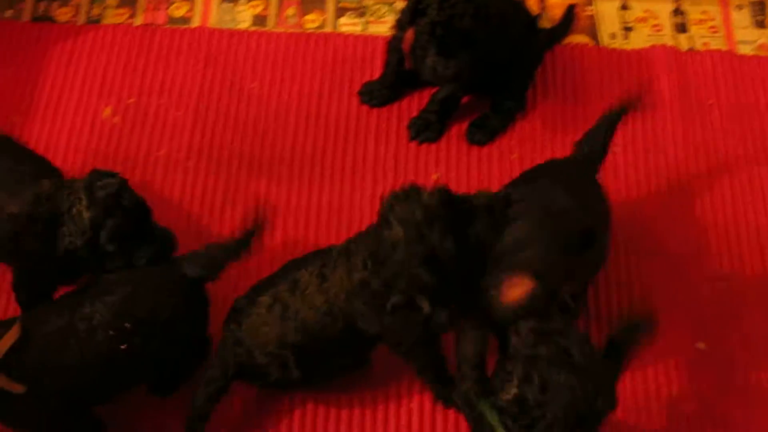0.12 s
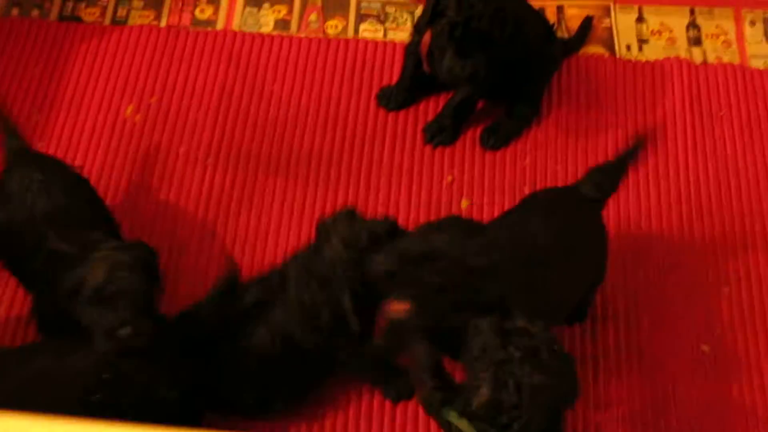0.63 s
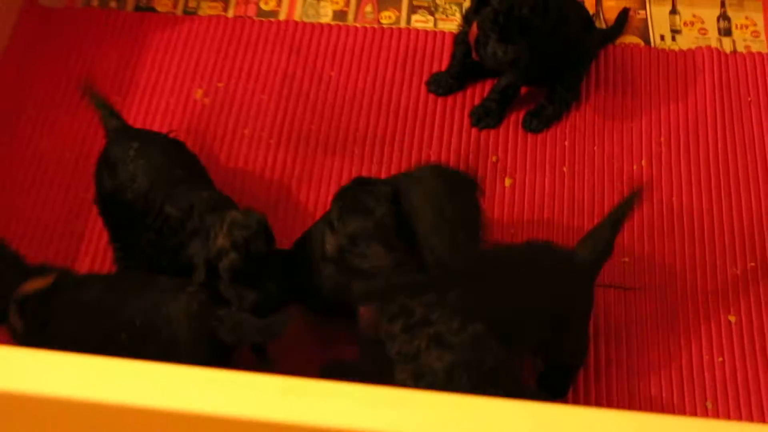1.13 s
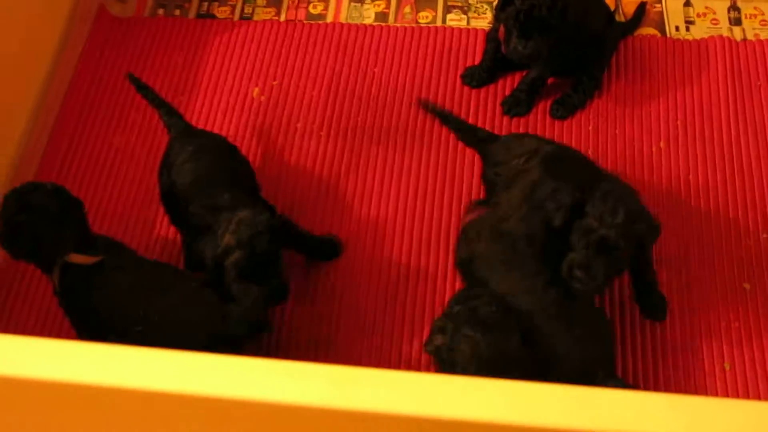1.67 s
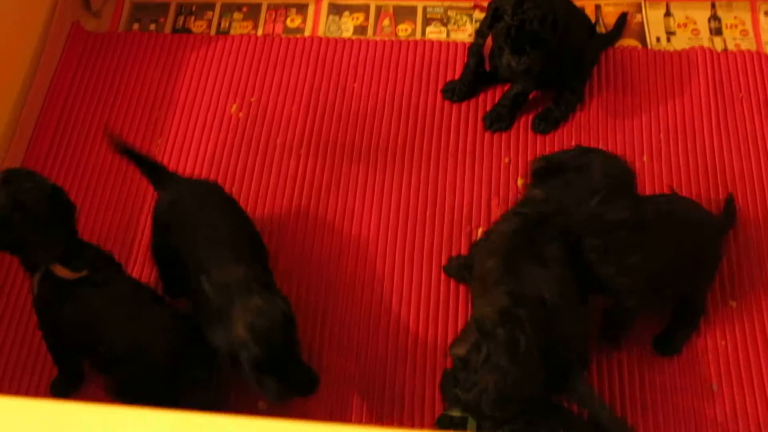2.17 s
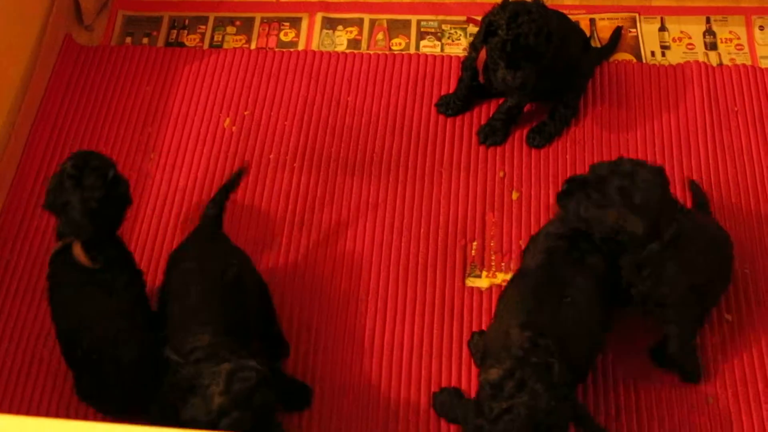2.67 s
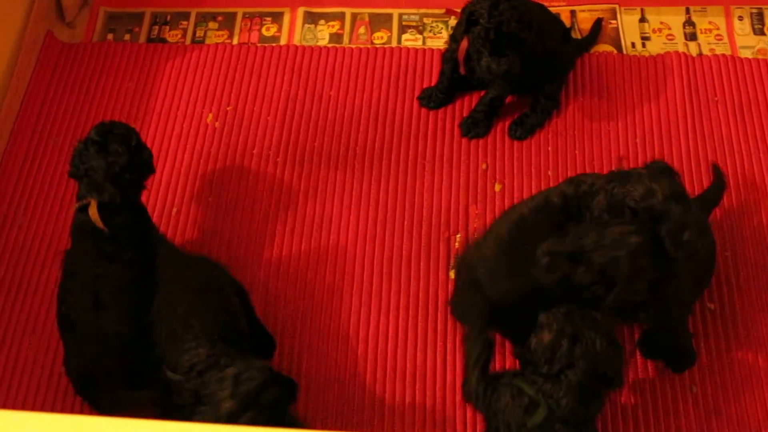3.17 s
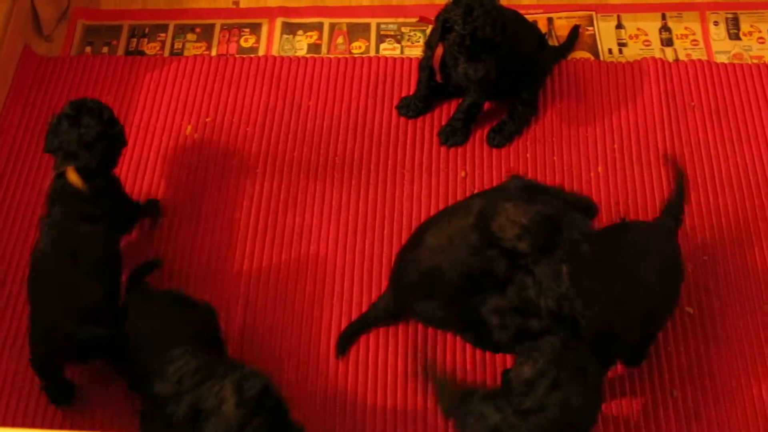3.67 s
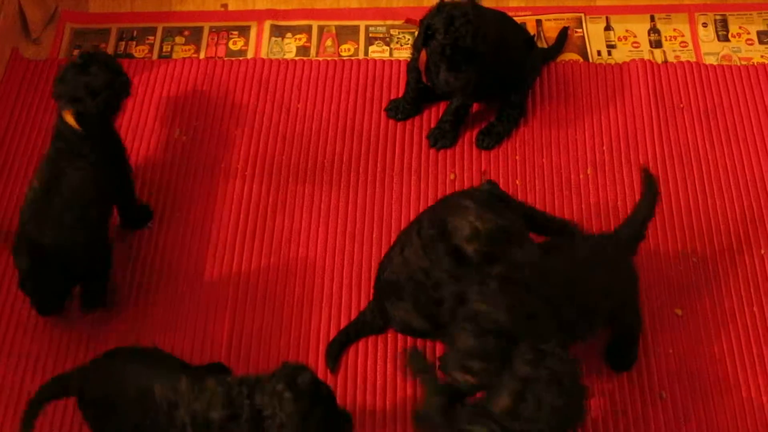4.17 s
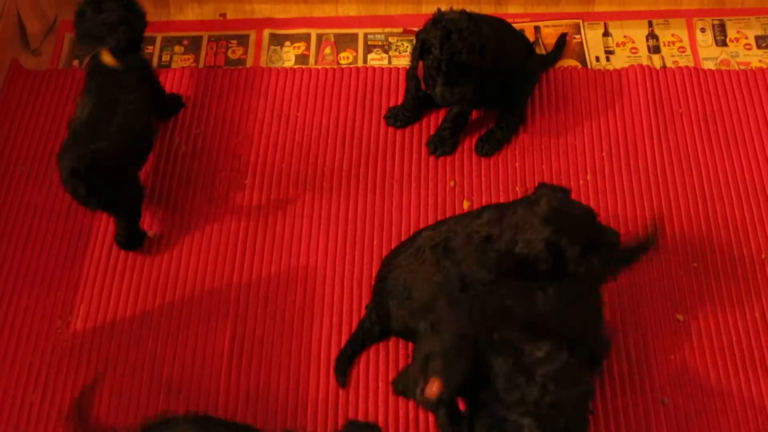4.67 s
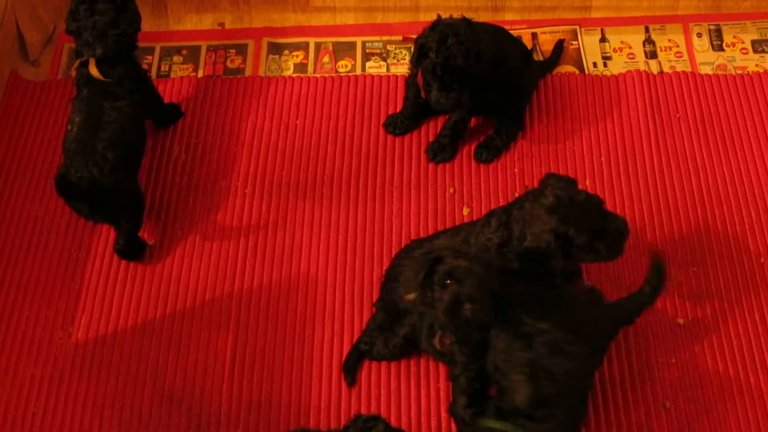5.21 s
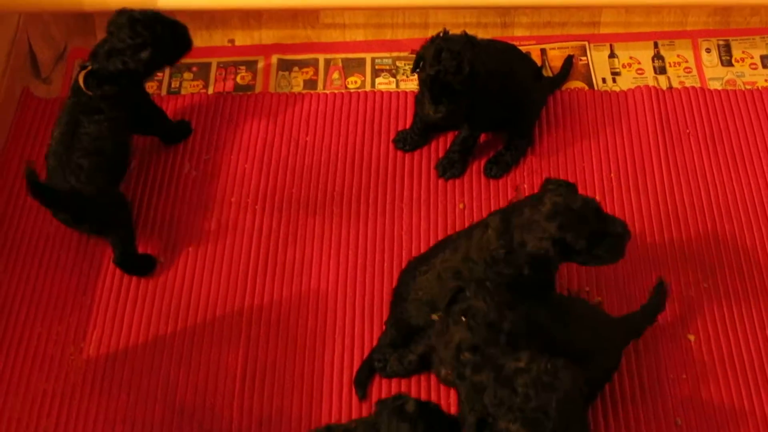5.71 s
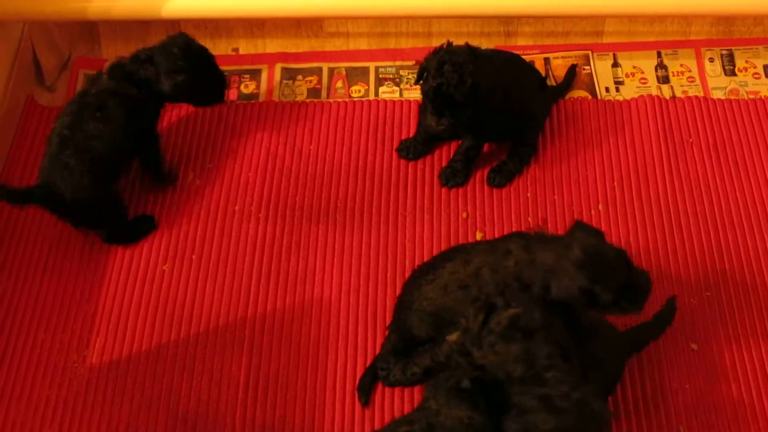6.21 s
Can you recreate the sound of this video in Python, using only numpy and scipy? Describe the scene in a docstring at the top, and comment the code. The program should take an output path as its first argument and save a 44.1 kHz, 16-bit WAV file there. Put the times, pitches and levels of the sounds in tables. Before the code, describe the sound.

A litter of puppies wrestles on a mat in a wooden pen indoors. Short puffs of breath come first, then rough little growls with a raspy, toothy edge, separated by pants and snorts. Soft paw thumps, wet mouth ticks and nasal air slip in between. The strongest snarl comes past the middle; one more growl and a tiny final grunt follow. Close microphone, faint room hum, short echo.

```python
"""Puppies wrestle on a rubber mat in a wooden pen indoors, over shaped noise for the faintly humming room.
They pant and snort in puffs of hiss; from 0.45 s they growl in bursts, vocal pulses ringing throat and mouth.
From 1.4 s short pushes ring the mat, wet ticks ring tongue and teeth, and nostrils blow resonant noise.
From 2.4 s low noise swells as air brushes the microphone; it fades by 5.8 s, and the last growl follows."""
import sys
import numpy as np
from scipy import signal
from scipy.io import wavfile
from scipy.ndimage import uniform_filter1d

SR = 44100
rng = np.random.default_rng(int(sys.argv[2]) if len(sys.argv) > 2 else 0)


def undo_db(level):
    """Turn decibels back into plain size, where 20 dB means ten times bigger."""
    steps = np.asarray(level, float) / 20
    return 10 ** steps


def waveform_to_disk(signal):
    """Save audio, clipped to [-1, 1], as 16-bit WAV at the path in sys.argv[1]."""
    frames = np.transpose(np.atleast_2d(signal))
    scaled = np.clip(frames, -1, 1) * 32767
    samples = np.round(scaled).astype(np.int16)
    wavfile.write(sys.argv[1], SR, samples)


N = 279594

# The growls, one list of rows for each.
# Each row: time in seconds, throat level in dB, pitch in Hz, roughness from 0 to 1.
GROWL_CURVES = [
    [(.45, -46, 200.2, 0.74), (.47, -37, 206.1, 0.75), (.54, -34.5, 212.8, 0.55), (.72, -32, 208.4, 0.64),
     (.87, -29.5, 252.7, 0.69)],
    [(.897, -30.5, 269.6, 0.54), (1.005, -35.5, 260, 0.49), (1.075, -36, 193.9, 0.36),
     (1.13, -33, 232.5, 0.67), (1.19, -44.5, 227.6, 0.78), (1.25, -48.5, 217.7, 0.94)],
    [(1.312, -48.5, 200.7, 0.84), (1.39, -37, 258.6, .8), (1.418, -42.5, 241.1, 0.87)],
    [(1.445, -40, 199.3, 0.87), (1.58, -35.5, 204.7, 0.7), (1.75, -35.5, 193.7, 0.59),
     (1.87, -52, 158.4, 0.78)],
    [(2.315, -70, 204, 0.65), (2.335, -33, 202.4, 0.52), (2.5, -32.5, 199, 0.5),
     (2.575, -34.5, 229.4, 0.33), (2.7, -35, 212.6, 0.29), (2.8, -34, 182.2, 0.51), (2.84, -42, 157, 0.4),
     (2.92, -58, 144.7, 0.42)],
    [(4.415, -43, 225.1, 0.69), (4.44, -28, 231.7, 0.5), (4.48, -26.5, 249.2, 0.44),
     (4.57, -24.5, 256.1, 0.42), (4.71, -29, 254.8, 0.51), (4.82, -30, 246.2, 0.4),
     (4.84, -41, 249.1, 0.57)],
    [(5.118, -35, 237, 0.55), (5.2, -30, 245, 0.66), (5.39, -32, 230.2, 0.63), (5.62, -36, 191.1, 0.53),
     (5.74, -44, 180.4, 0.64), (5.78, -64, 185, 0.81)],
    [(6.31, -44, 176.4, 0.06), (6.34, -40.5, 189.2, 0.55)],
]


def rms_one(x):
    """Scale to rms 1."""
    return x / np.sqrt(np.mean(x ** 2) + 1e-20)


def evened(x, span_s=0.08):
    """Hold the running rms at 1."""
    return x / np.sqrt(uniform_filter1d(x ** 2, int(span_s * SR)) + 1e-12)


def in_time(rows):
    """Columns of a curve, one value a sample; the first column is time."""
    s, *columns = np.transpose(rows)
    return [np.interp(np.arange(N) / SR, s, c) for c in columns]


def at_hz(points, hz):
    """Read a spectrum on a log frequency axis."""
    points_hz, values = np.array(points).T
    return np.interp(np.log(hz), np.log(points_hz), values)


def cut(x, hz, kind, order=2):
    """Butterworth filter."""
    return signal.sosfilt(signal.butter(order, hz, kind, fs=SR, output="sos"), x)


def drift(rate_hz):
    """Random wander with spread 1: noise through two equal one-pole lowpasses."""
    r = np.exp(-2 * np.pi * rate_hz / SR)
    wander = signal.lfilter([1], [1, -2 * r, r * r], rng.standard_normal(N + SR))
    return rms_one(wander[SR:])   # the first second settles the filter


def resonance(hz, width):
    """Coefficients of a two-pole resonance with gain 1 on top."""
    r = np.exp(-np.pi * width / SR)
    return (1 - r * r) / 2 * np.array([1, 0, -1]), [1, -2 * r * np.cos(2 * np.pi * hz / SR), r * r]


def twice(x, hz, width):
    """A resonance applied twice, with dark flanks."""
    once = signal.lfilter(*resonance(hz, width), x)
    return signal.lfilter(*resonance(hz, width), once)


def tract(x, modes):
    """Resonances in parallel, signs alternating."""
    return sum((-1) ** k * undo_db(db) * signal.lfilter(*resonance(hz, width), x)
               for k, (hz, width, db) in enumerate(modes))


def moving(x, hz, width):
    """A resonance whose centre and width are renewed block by block."""
    out, state, width = np.zeros(N), np.zeros(2), np.broadcast_to(width, N)
    for i in range(0, N, 256):
        out[i:i + 256], state = signal.lfilter(*resonance(hz[i], width[i]), x[i:i + 256], zi=state)
    return out


def impulses(events):
    """One single-sample click for each (seconds, dB)."""
    out = np.full(N, 1e-18)
    for s, db in events:
        out[int(s * SR)] = undo_db(db)
    return out


def banded_noise(spectrum, patchy_db):
    """Half-octave bands of stereo noise with their own level, flicker and left-right likeness; rms 1."""
    # How alike left and right are. Each row: frequency in Hz, likeness from 0 to 1.
    likeness = [(200, 0.96), (1000, 0.014), (9000, 0.58), (14000, 0.045)]
    out, edges = 0, 35 * 2 ** np.arange(0, 9.1, .5)
    white, flicker = rng.standard_normal((2, 2, N)), drift(17.0)
    for k, (low, high) in enumerate(zip(edges, edges[1:])):
        mid, side = cut(white[k % 2], [low, high], "band")
        hz = np.sqrt(low * high)
        alike = np.clip(at_hz(likeness, hz), -1, 1)
        band_flicker = np.roll(flicker, k * N // 19)   # every band reads the flicker at another time
        gain = undo_db(at_hz(spectrum, hz) + patchy_db * band_flicker)
        out = out + gain * (np.sqrt(1 + alike) * mid + np.sqrt(1 - alike) * side * [[1], [-1]])
    return rms_one(out)


def room_hum():
    """The room's floor: patchy noise that falls towards the treble, its lowest bass cut."""
    # Tone of the floor. Each row: frequency in Hz, relative density in dB per Hz.
    floor_tone = [(150, -6), (460, -4), (3100, -13.5), (8000, -17.5), (11500, -26.5), (16000, -39)]
    return undo_db(-49) * cut(banded_noise(floor_tone, patchy_db=3.5), 135, "high", order=4)


def pen_drone():
    """The wooden pen hums along: noise through one narrow low resonance."""
    return undo_db(-55.5) * rms_one(twice(rng.standard_normal(N), 273.7, 59))


def panting():
    """Air hisses through nose and teeth: puffs burst out, hold, die away; a dull part rushes in the throat."""
    # Pants and snorts. Each row: start in seconds, hiss level in dB before a common trim,
    # hold in seconds, throat part relative to the hiss in dB.
    pants = [(0.205, -36.5, 0.037, 6), (0.376, -38, 0.15, -3), (0.721, -36, 0.15, 4.5),
             (1.189, -37, 0.0095, -3.5), (1.3084, -35, 0.062, -2), (2.091, -35.5, 0.027, -2),
             (2.265, -30.5, 0.054, -8.5), (2.7578, -28, 0.033, -6), (2.9892, -38.5, 0.061, -8),
             (3.06, -35, 0.0065, -0.5), (3.256, -28, 0.037, -13), (3.515, -33, 0.052, -6.5),
             (3.724, -25, 0.019, -11.5), (3.958, -36, 0.14, -4.5), (4.1451, -27, 0.026, -12),
             (4.7878, -24, 0.026, -2), (5.336, -30, 0.04, -24), (6.0095, -43.5, 0.16, -9),
             (6.186, -40.5, 0.0066, -14)]
    # Tone of the hiss. Each row: frequency in Hz, relative density in dB per Hz.
    breath_tone = [(2000, -7), (4200, 5.5), (6500, 0), (10400, -6.5), (14500, -37)]
    trim_db, t60_s, swell_s = -11.5, 0.6, 0.0009
    t, hiss, dull = np.arange(N) / SR, np.zeros(N), np.zeros(N)
    for s, hiss_db, held_s, dull_db in pants:
        age = np.maximum(t - s, 0)
        swell = 1 - np.exp(-age / swell_s) * 0.088   # starts just short of full strength
        fade_db = -60 * np.maximum(age - held_s, 0) / t60_s
        puff = undo_db(hiss_db + trim_db + fade_db) * swell * (t > s)
        hiss += puff
        dull += puff * undo_db(dull_db)
    rush = rms_one(cut(rng.standard_normal(N), [400, 2700], "band"))
    spit = undo_db(2.2 * drift(160))   # wet jaws make the hiss sputter
    return hiss * spit * banded_noise(breath_tone, patchy_db=-0.5), dull * rush


def posture(t):
    """How each growl is held: mouth opening, closing so far, chest tone and jaw resonance width."""
    # One row a growl: mouth opening at first in dB, closing by the end in dB (negative opens),
    # lateness of the closing as a power, chest tone in dB at its resonance.
    postures = [(2.5, 17, 1.1, -4), (-2, 7, 1.2, 2.5), (-7.5, 10, 1, -0.5), (4.5, 18, 0.65, 1),
                (-10.5, 8, 1.75, 3.5), (2.5, 19, 3, 1), (-3, 13.5, 2.05, 0.5), (-6, -3, 1.17, -21)]
    # Width of the jaw resonance in Hz, one value a growl.
    jaw_widths = [200, 350, 500, 150, 450, 400, 200, 500]
    starts = np.array([g[0][0] for g in GROWL_CURVES])
    lengths = np.array([g[-1][0] for g in GROWL_CURVES]) - starts
    which = np.clip(np.searchsorted(starts - .01, t) - 1, 0, None)
    first_db, closing_db, late, chest_db = np.array(postures)[which].T
    progress = np.clip((t - starts[which]) / lengths[which], 0, 1)
    closed_db = closing_db * progress ** late
    return first_db - closed_db, closed_db, chest_db, np.array(jaw_widths)[which]


def growls():
    """Uneven vocal-fold pulses, throbbing with a loose flap of tissue, ring throat and mouth."""
    # Fixed throat resonances. Each row: centre in Hz, width in Hz, level in dB.
    throat_modes = [(636, 46, 11), (748, 49.5, 11.5), (1260, 610, -7)]
    # Bright mouth resonances; the first two move.
    # Each row: centre in Hz (full spread for those two), width in Hz, level in dB before strain.
    bright_modes = [(4250, 480, 8), (5200, 560, 5), (7000, 1300, 2.5), (13200, 3400, 0)]
    # The jaw resonance moves as the mouth changes shape. Each row: time in seconds, centre in Hz before wander.
    jaw_path = [(.45, 1600), (.58, 1800), (.82, 1420), (.9, 1335), (1.2, 1220), (1.33, 1870), (1.44, 1655),
                (1.53, 1800), (1.58, 1742), (1.63, 1418), (2.33, 1678), (2.65, 1451), (4.6, 1840),
                (5.12, 1619), (6.31, 1455)]

    def silent(row, shift_s):
        return (row[0] + shift_s, -90, *row[2:])

    rows = []
    for g in GROWL_CURVES:
        rows += [silent(g[0], -.006), *g, silent(g[-1], 0.017)]
    level_db, pitch_hz, rough = in_time(rows)
    rough = np.clip(rough, 0, 1)
    open_db, closed_db, chest_db, jaw_width = posture(np.arange(N) / SR)
    wander = .015   # of the centre frequency
    jaw_hz = in_time(jaw_path)[0] * (1 + wander * drift(4.5))
    chest_db = chest_db - 0.35 * np.abs(pitch_hz - 244.6)   # grows towards its resonance

    # vocal folds
    cycles = np.cumsum(pitch_hz * (1 + .07 * rough ** 2 * drift(60) + .012 * drift(14))) / SR
    flap_hz = 72 * (1 + 0.2423 * drift(14.3))   # about a third of the pitch
    flap = np.sin(2 * np.pi * np.cumsum(flap_hz) / SR)
    throb = undo_db(rough * (1.75 * flap + 3.3 * drift(42)))
    uneven = undo_db(2.54 * rough * rng.standard_normal(N))
    pulses = rms_one(np.diff(np.floor(cycles), prepend=0) * uneven)
    # turbulence renewed on every cycle
    puffs = rms_one(rng.standard_normal((3, N)) * np.exp(-1.5 * (cycles % 1)))
    clean = pulses * np.sqrt(1 - rough ** 2)
    source = throb * (clean + 1.65 * rough * puffs[0])
    voiced = throb * (clean + 2.0 * rough ** 1.5 * cut(puffs[0], 560, "high"))
    chest = np.sqrt(2) * np.sin(2 * np.pi * cycles) * undo_db(2.5 * drift(28))

    # closed jaws darken the voice
    muffled = signal.lfilter(*resonance(363.0, 73), voiced + 0.63 * rough * puffs[1])
    muffled = undo_db(6.5 - 0.32 * open_db + 0.5 * closed_db) * muffled
    throat = evened(cut(tract(voiced, throat_modes) - muffled, 193, "high", order=4))
    wide = undo_db(-26 + 2.5 * open_db) * signal.lfilter(*resonance(2200, 450), source)
    narrow = moving(source + .5 * throb * puffs[0], jaw_hz, jaw_width)
    narrow = moving(narrow, jaw_hz, 2 * jaw_width)
    jaw = evened(cut(narrow - wide, 2700, "low", order=6))

    # the higher the resonance, the more force it needs
    strain_db = 18.5 + level_db
    rasp = throb * (pulses + puffs[0] + 1.23 * puffs[1:])   # two sides
    teeth = sum(undo_db(db + strain_db * hz / 20000) * twice(rasp, hz, width) for hz, width, db in bright_modes[2:])
    # the two lowest bright resonances lie further apart in growls that start with a wider mouth
    meet_hz, spread_per_db = 4650, 0.23
    first_open_db = open_db + closed_db
    parted = np.clip(.6 + spread_per_db * first_open_db, 0, 1)
    for hz, width, db in bright_modes[:2]:
        centre_hz = (meet_hz + parted * (hz - meet_hz)) * (1 + wander * drift(6.1))
        ringing = np.array([moving(moving(ear, centre_hz, width), centre_hz, width) for ear in rasp])
        teeth += undo_db(db + strain_db * hz / 20000) * ringing
    effort_db = 0.15 * level_db   # hard snarls hiss more
    voice = undo_db(level_db) * (throat + undo_db(open_db) * jaw + undo_db(chest_db) * chest)
    snarl = undo_db(level_db - 5.5 + 1.15 * open_db + 0.18 * closed_db + effort_db) * teeth
    return voice, snarl


def thumps():
    """Paws and bodies land: a soft push rings the mat and the boards under it."""
    # Each row: time in seconds, strength of the push in dB before makeup gain.
    landings = [(1.37, -46), (3.921, -39), (4.116, -39.5)]
    push = cut(impulses(landings), 380, "low")
    return undo_db(58.0) * signal.lfilter(*resonance(117, 24), push)


def clicks():
    """Wet ticks of tongue and teeth under a millisecond long, each ringing at its own pitch."""
    # Each row: time in seconds, strength of the impulse in dB, ring in Hz.
    ticks = [(1.5825, -18, 4000), (2.7588, -12, 9500), (3.7256, -13, 9000), (4.15, -12, 8500),
             (4.4151, -12, 11000), (5.34, -15, 10500), (6.19, -16, 4500)]
    return sum(twice(impulses([(s, db)]), hz, 0.89 * hz) for s, db, hz in ticks)


def nostrils():
    """Air forced through a nostril: resonant noise swells and fades, a little different on each side."""
    # From thin whistle to broad snort.
    # Each row: start in seconds, end in seconds, centre in Hz, width in Hz, peak level in dB.
    blows = [(1.611, 1.865, 6344, 6900, -36.5), (4.303, 4.413, 1985, 259.8, -50),
             (4.879, 5.085, 2252, 199.4, -49.5)]
    t, air, out = np.arange(N) / SR, rng.standard_normal((3, N)), 0
    for start, end, hz, width, db in blows:
        swell = np.sin(np.pi * np.clip((t - start) / (end - start), 0, 1)) ** 2
        out = out + undo_db(db) * swell * rms_one(twice(air[0] + air[1:], hz, width))
    return out


def draught():
    """Air on the microphone: lumpy rumble in the lowest bass."""
    # Each row: time in seconds, level in dB before the lumps.
    gust = [(0, -70), (2.4, -70), (3.1, -49.5), (5.2, -49.5), (5.8, -69)]
    level_db, = in_time(gust)
    return undo_db(level_db + 3.9 * drift(24.0)) * rms_one(cut(rng.standard_normal(N), [30, 110], "band"))


def room(x):
    """Echo of the pen: six feedback delays a side, very slightly duller on every round."""
    t60_s, wall_cut_hz = 0.28, 56000   # the cut lies above hearing, so the walls hardly dull the treble
    out, dull = np.zeros((2, N)), np.exp(-2 * np.pi * wall_cut_hz / SR)
    for k, lag in enumerate((rng.uniform(.006, .03, 12) * SR).astype(int)):
        loop, gain, state = x.copy(), undo_db(-60 * lag / SR / t60_s), [0.]
        for i in range(lag, N, lag):
            back, state = signal.lfilter([gain * (1 - dull)], [1, -dull], loop[i - lag:i], zi=state)
            loop[i:i + lag] += back[:N - i]
        out[k % 2] += (loop - x) * (-1) ** (k // 2)
    mid = (out[0] + out[1]) / 2
    side = cut((out[0] - out[1]) / 2, 1350, "high", order=1)   # close ports agree in the bass
    return np.array([mid + side, mid - side])


def scene():
    """Pups, their echo in the pen, their dry hiss, and the room's floor."""
    hiss, rush = panting()
    voice, snarl = growls()
    pups = voice + clicks() + thumps() + rush
    lean_db = np.array([[0.7], [-0.7]])   # the snarl leans a little to the left
    air = snarl * undo_db(lean_db) + hiss + nostrils()
    return pups + undo_db(-9.5) * room(pups) + air + room_hum() + pen_drone() + draught()


def roll_off(x):
    """The treble ends steeply here."""
    return signal.sosfilt(signal.butter(12, 16560, fs=SR, output="sos"), x)


def record(dry):
    """A small microphone, deaf near 3 kHz and thin in the bass; the whole level dips briefly once."""
    heard = dry - 0.5 * signal.lfilter(*resonance(2970, 1420), dry)
    t = np.arange(N) / SR
    dip_from_s, dip_to_s, dip_db = .826, .895, -12
    dip = uniform_filter1d(1. * (t > dip_from_s) * (t < dip_to_s), size=40)   # softened edges
    mix = cut(heard * undo_db(dip_db * dip), 146, "high")
    return roll_off(mix)


dry = scene()
out = record(dry)
waveform_to_disk(out)
```